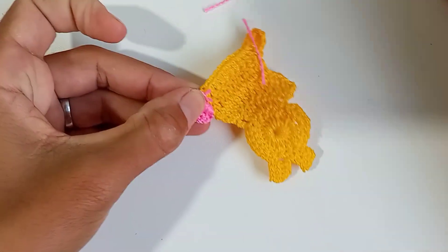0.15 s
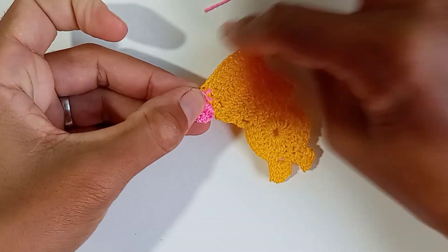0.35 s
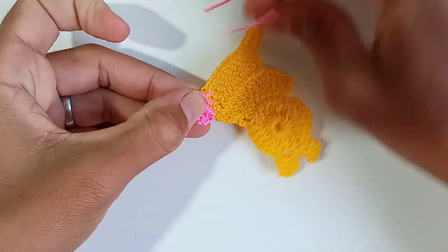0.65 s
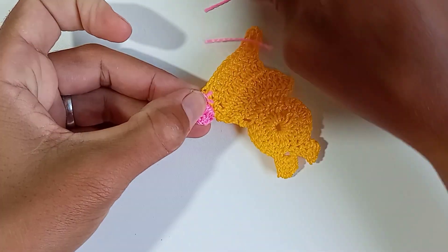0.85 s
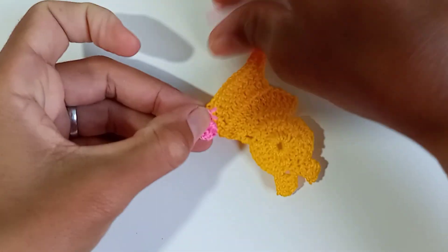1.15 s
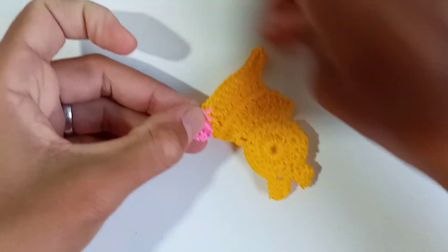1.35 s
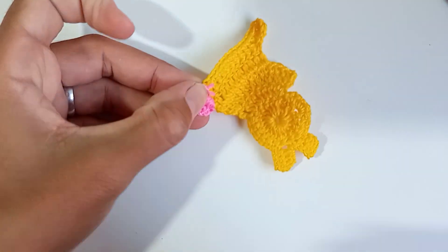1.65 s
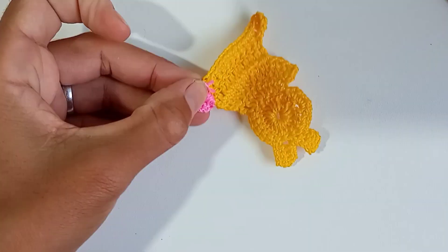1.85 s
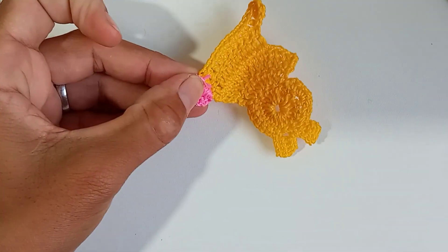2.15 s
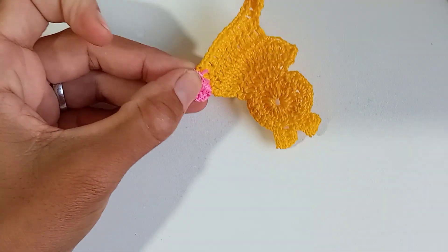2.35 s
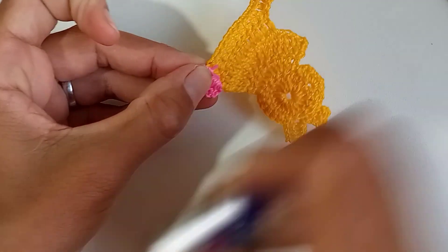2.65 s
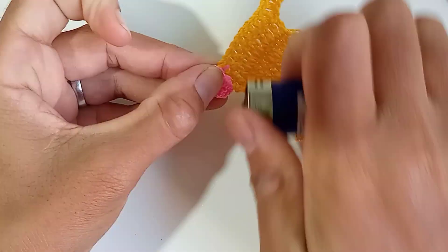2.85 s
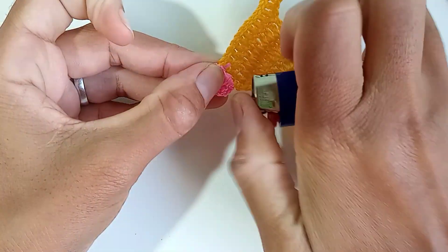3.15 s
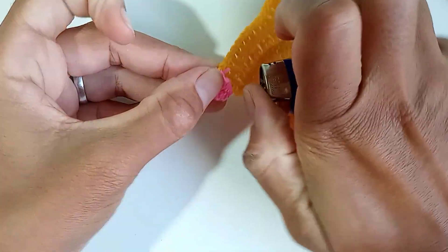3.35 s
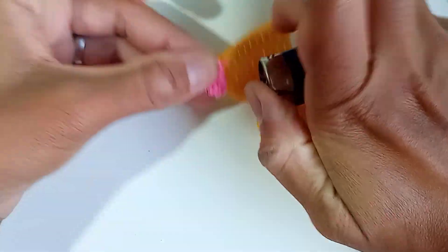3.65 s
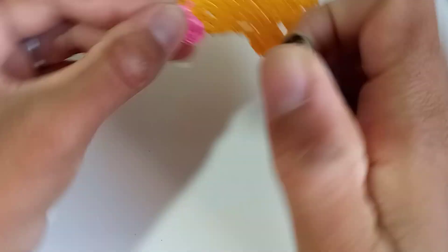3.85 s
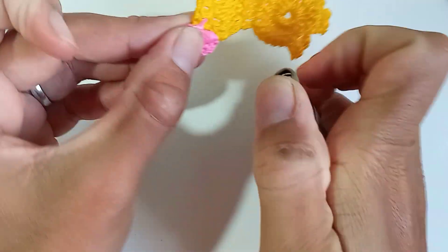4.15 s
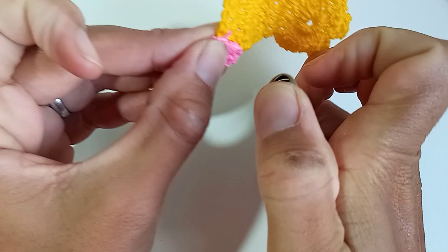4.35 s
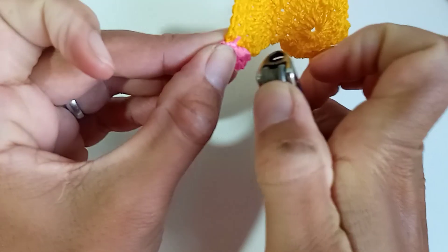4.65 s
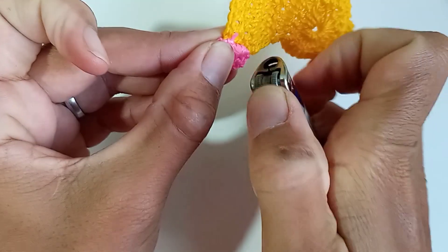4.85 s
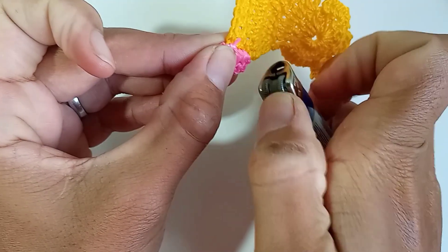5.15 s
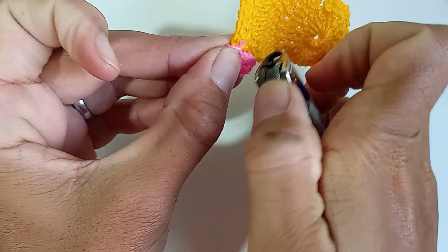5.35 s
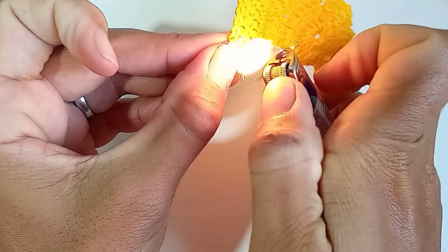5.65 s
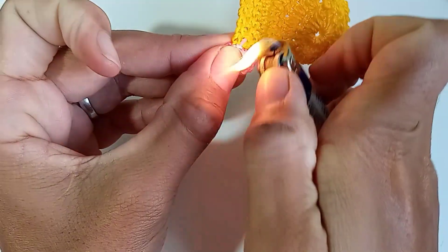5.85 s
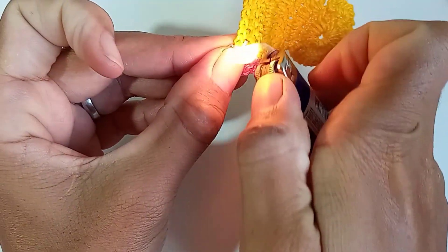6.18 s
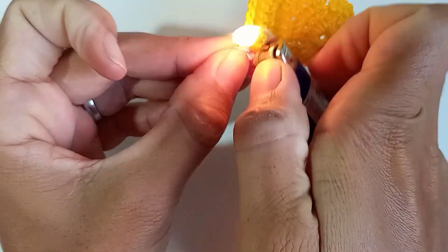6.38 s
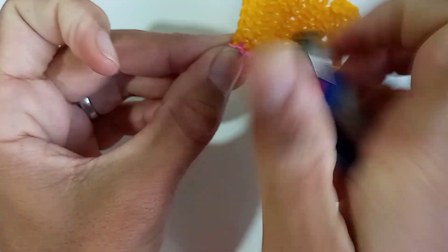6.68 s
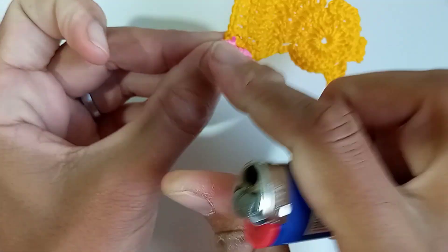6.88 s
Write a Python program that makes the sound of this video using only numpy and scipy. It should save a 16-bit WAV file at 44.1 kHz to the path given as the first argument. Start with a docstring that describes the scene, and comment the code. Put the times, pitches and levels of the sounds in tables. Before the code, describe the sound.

Soft table knocks and a short drag, then a pocket lighter clicks and rasps three times in a small, quiet, faintly humming room.

```python
"""Lighter and hands at a table

Hands drag and set down something on a table in a small quiet room. Skin and yarn rustle as shaped noise.
A pocket lighter is thumbed three times: noise bursts through resonances make its clicks, swelling grains its grind.
A low motor hum throbs by beating tones over a steady hiss, and narrow bands of noise hoot faintly far off.
Two ports hear it all; decaying noise gives the room."""
import sys
import numpy as np
from scipy import signal
from scipy.fft import rfft, irfft, next_fast_len
from scipy.io import wavfile
from scipy.ndimage import uniform_filter1d, map_coordinates

SR = 44100
rng = np.random.default_rng(int(sys.argv[2]) if len(sys.argv) > 2 else 0)


def put_to_file(sound):
    """Save the sound as 16-bit audio at rate SR, in the file named by the first command-line argument."""
    columns = np.atleast_2d(sound).T  # one column per channel
    safe = np.clip(columns, -1, 1)
    whole_steps = np.round(safe * 32767)
    wavfile.write(sys.argv[1], SR, whole_steps.astype(np.int16))


N = 309582
# Source levels in the tables stand ahead of the gains in the functions, scene() and record().


def amp(db):
    """Decibels to amplitude: 20 dB is a factor of ten."""
    return 10 ** (np.asarray(db) / 20)


def unit(x):
    """Normalisation by power: scale to rms 1."""
    return x / np.sqrt(np.mean(x ** 2) + 1e-20)


def along(points, hz):
    """Interpolation of (Hz, value) points on a logarithmic frequency axis."""
    point_hz, value = np.transpose(points)
    return np.interp(np.log(hz + 1), np.log(point_hz + 1), value)


def levels(rows):
    """Envelopes linear in decibels: a gain per sample for each dB column, silent outside the table."""
    point_s, *columns = np.transpose(rows)
    now = np.arange(N) / SR
    return [amp(np.interp(now, point_s, column, -200, -200)) for column in columns]


def wobble(rate, size=N):
    """Band-limited fluctuation: a smooth curve through random knots, rate of them a second."""
    knots = rng.standard_normal(int(size * rate / SR) + 4)
    return map_coordinates(knots, [np.arange(size) * rate / SR])


def filtered(x, response):
    """Linear filtering: the spectrum of x times a complex response of frequency."""
    m = next_fast_len(N + SR // 2)  # padding keeps tails from wrapping round
    spectrum = rfft(x, m) * response(np.fft.rfftfreq(m, 1 / SR))
    return irfft(spectrum, m)[..., :N]


def ringing(modes):
    """Modal superposition: damped resonances (freq_hz, width_hz, level_db) add with alternating sign."""
    def response(f):
        total = 0
        for k, (centre, width, db) in enumerate(modes):
            resonance = 1j * f * width / (centre * centre - f * f + 1j * f * width)
            total = total + (-1) ** k * amp(db) * resonance
        return total
    return response


def twice(modes):
    """Cascaded filtering: resonances applied twice fall off on steeper skirts."""
    return lambda f: ringing(modes)(f) ** 2


def grains(response, rate, rough_db):
    """Friction as many small slips: noise of uneven grain through a response, rms 1."""
    uneven = amp(rough_db * wobble(rate)) * rng.standard_normal(N)
    return unit(filtered(uneven, response))


def lighter_clicks():
    """Impact excitation: a short burst at each click of lever or wheel sets the lighter's parts ringing."""
    # clicks: peak_s, case_db, metal_db, brightness_db, rise_s, left_over_right_db
    clicks = [(.6066, -78, -56.5, 8.5, .0004, -4.5), (.9718, -78, -55, -7, 0.00092, -6),
              (3.0191, -40, -20.5, 1.5, 0.00068, -1), (4.4093, -57.5, -43.5, 2, 0.00077, -2),
              (4.422, -49, -43, 4.5, .001, 4), (4.436, -60, -47, -5.5, .001, -2.5),
              (4.4506, -58, -33, -1.5, .0015, 5), (4.457, -54, -32.5, 5.5, 0.001345, 13.5),
              (4.4695, -44.5, -26, 10.5, .002, 4), (4.4727, -34, -19, 5, 0.000677, -6.5),
              (4.7856, -34, -53.5, -9.5, .0003, 6.5), (4.816, -63, -45.5, 1.5, .001, 1.5),
              (5.047, -54.5, -44.5, 0.5, .002, -1.5), (5.068, -45.5, -31.5, 7, 0.0023, -1.5),
              (5.0756, -38, -21.5, 4, 0.0018, 0.3), (5.0814, -32, -31, 0.5, .001, -14.5),
              (5.3494, -63, -48.5, -6, .0012, 7), (5.3587, -36, -45, -1.5, 0.0017, -1),
              (5.559, -44, -40, -4.5, .002, -7.5), (5.569, -47, -27.5, 5.5, .0015, 4),
              (5.5769, -18.5, -21, -1.5, 0.00055, -9), (6.5665, -33.5, -46.5, -15, 0.0012, -1),
              (6.6, -37, -42.5, 13.5, .001, 5), (6.6039, -36, -30, 3.5, 0.00081, -6.5)]
    # resonances applied twice: freq_hz, width_hz, level_db (width and level of one pass)
    case = [(1780, 350, -5.5), (3200, 950, 0.5), (4900, 320, 4)]  # plastic
    crack = [(2600, 3500, -1), (4770, 6200, 0)]  # the broad, duller part of the metal click
    hood = [(5590, 2400, -1), (8800, 4000, -2.5)]
    spring = [(11300, 8300, -0.5), (14800, 2500, 5.5)]
    click_t60_s, hood_db = 0.016, -1
    parts = np.zeros((2, 4, N))
    t = np.arange(-SR // 100, SR // 40) / SR
    for peak, case_db, metal_db, bright_db, rise, pan_db in clicks:
        onset = np.exp(np.minimum(t, 0) / rise)
        decay = amp(-60 * np.maximum(t, 0) / click_t60_s)
        chatter = np.where(t < 0, onset, decay) * rng.standard_normal((4, len(t)))
        sharp_blow = 4 * (t == 0)
        sizes = amp([case_db, metal_db - bright_db, metal_db + hood_db, metal_db + bright_db])[:, None]
        burst = sizes * amp(3.0) * (chatter + sharp_blow)
        a = round(peak * SR) - SR // 100
        pan = amp([pan_db / 2, -pan_db / 2])[:, None, None]
        parts[..., a:a + len(t)] += pan * burst
    return sum(filtered(parts[:, k], twice(modes)) for k, modes in enumerate([case, crack, hood, spring]))


def flint_wheel():
    """Friction and beating: the wheel's grind swells up to each spark, then two close modes ring on."""
    # thumb strokes: thumb_lands_s, slow_turn_db, spark_s, peak_db, ring_db
    strikes = [(4.408, -53, 4.472, -21.5, -53.5), (5.042, -51.5, 5.076, -23.5, -62),
               (5.525, -72, 5.575, -22, -63.5)]
    # relative spectrum of the grind: freq_hz, level_db
    flint = [(250, -62.5), (500, -22), (1500, -18.5), (2600, -4), (4000, -6.5), (8000, 2), (12000, -0.5),
             (16000, 4)]
    spin_up_db_per_s, stop_db_per_s = 820, 1100.5
    ring_after_s, ring_t60_s, ring_hz, beat_hz = 0.027, 0.53, 1365, 7.2
    force, linger = np.zeros(N), np.zeros(N)
    now, t = np.arange(N) / SR, np.arange(SR // 3) / SR
    pair = np.sin(2 * np.pi * ring_hz * t) + 0.46 * np.sin(2 * np.pi * (ring_hz - beat_hz) * t)
    for lands, creep_db, spark, peak_db, ring_db in strikes:
        swell_db = np.maximum(creep_db, peak_db - spin_up_db_per_s * (spark - now))
        stop_db = peak_db - stop_db_per_s * (now - spark)
        force += (now > lands) * amp(np.where(now < spark, swell_db, stop_db))
        ring = amp(ring_db - 60 * t / ring_t60_s) * (1 - np.exp(-t / 0.0047)) * pair
        linger[round((spark + ring_after_s) * SR):][:len(t)] += ring
    grind = force * grains(lambda f: amp(along(flint, f)), 700, rough_db=1.5)
    return (grind + linger) * amp([[-1.5], [1.5]])


def dragging_and_knocks():
    """Forced modal vibration: friction and small knocks shake the table top and the dragged thing."""
    # one long rub, harder and then stopping: time_s, boom_db, scrape_db, grit_db, skin_db (skin is in hands)
    friction = np.array(levels(RUB)[:3])
    # short skids of the thing: start_s, length_s, sag_db_per_s, boom_db, scrape_db
    skids = [(0.965, 0.096, 154, -42.5, -73), (1.133, 0.068, 50, -49.5, -68.5),
             (1.977, 0.056, 80, -66, -55.5), (2.03, 0.056, 29, -64, -53.5), (2.059, 0.082, 125, -53.5, -68)]
    # small knocks: start_s, top_db, thing_db
    knocks = [(0.973, -12, -50), (1.521, -39, -48), (1.982, -42, -37), (2.061, -33, -32), (2.094, -27, -52),
              (3.021, -46, -37), (5.577, -29, -22)]
    # resonances: freq_hz, width_hz, level_db (friction passes through them twice, knocks once)
    top = [(258.2, 17.5, 1.5), (366, 86, 0.5)]
    thing = [(609, 110, 3), (882, 77, 3.5), (1000, 99, 2), (1370, 225, 0)]
    grit_modes = [(1423, 290, 1), (2130, 620, 2.5), (2940, 850, 4.5), (3840, 2700, -1)]
    skid_rise_s, skid_stop_db_per_s, skid_grit_db = 0.0049, 600, -17
    judder_hz, judder_waver_hz, judder_db = 360.7, 7.1, 1.5  # the rubbed top also sings at its upper mode
    t = np.arange(SR // 2) / SR
    blows = np.zeros((2, N))
    for start, top_db, thing_db in knocks:
        a = round(start * SR)
        decay = amp(-60 * t[:300] / 0.0026)
        blows[:, a:a + 300] += amp([[top_db], [thing_db]]) * decay * rng.standard_normal((2, 300))
    for start, length, sag_db, boom_db, scrape_db in skids:
        fall = amp(-sag_db * t - skid_stop_db_per_s * np.maximum(t - length, 0))
        skid = fall * (1 - np.exp(-t / skid_rise_s))
        sizes = amp([[boom_db], [scrape_db], [scrape_db + skid_grit_db]])
        friction[:, round(start * SR):][:, :len(t)] += sizes * skid
    boom, scrape, grit = friction
    phase = 2 * np.pi * np.cumsum(judder_hz + judder_waver_hz * wobble(20)) / SR
    judder = amp(judder_db + 1.9 * wobble(24.9)) * np.sin(phase)
    drag = boom * (judder + amp(-4.5) * grains(twice(top), 41, rough_db=0.8))
    drag += scrape * grains(twice(thing), 90, rough_db=1.5)
    drag += grit * grains(twice(grit_modes), 200, rough_db=3)
    return drag + filtered(blows[0], ringing(top)) + filtered(blows[1], ringing(thing))


def low_thumps():
    """Free decay: each low thump in the table is an exponentially dying sine."""
    # thumps: start_s, level_db, pitch_hz, t60_s
    bumps = [(0, -35.5, 110.5, 0.35), (.115, -47, 110.6, 0.3), (1.506, -51.5, 55, 0.11),
             (3.995, -63, 55, 0.24)]
    out, t = np.zeros(N), np.arange(SR // 2) / SR
    for start, db, hz, t60 in bumps:
        envelope = amp(db - 60 * t / t60) * (1 - np.exp(-t / 0.0038))
        out[round(start * SR):][:len(t)] += envelope * np.sin(2 * np.pi * hz * t)
    return out


def hands():
    """Sliding friction of soft surfaces: broadband noise follows the rub, restless hands and skin over yarn."""
    # restless hands: time_s, level_db
    rustle = [(0, -70.5), (.5, -67.5), (1.15, -66), (1.95, -69.5), (2.6, -72.5), (3.1, -77), (3.75, -74.5)]
    # skin over yarn: start_s, length_s, level_db
    swishes = [(0.604, .04, -68), (2.001, 0.13, -59), (2.209, .03, -64), (2.278, 0.22, -65.5),
               (2.526, 0.028, -67.5), (3.284, 0.043, -73), (3.418, .22, -54.5)]
    # relative spectrum: freq_hz, level_db
    skin_spectrum = [(600, -7), (1000, -14.5), (2500, -10), (4500, -11), (6500, -5.5), (9000, -2.5),
                     (12000, 1.5), (16000, -1)]
    skin, t = levels(RUB)[3] + levels(rustle)[0], np.arange(SR // 2) / SR
    for start, length, db in swishes:
        arch = np.sin(np.pi * np.minimum(t / length, 1) ** 0.64) ** 2
        skin[round(start * SR):][:len(t)] += amp(db) * arch
    return skin * grains(lambda f: amp(along(skin_spectrum, f)), 150, rough_db=2.0)


# one long rub across the table: time_s, boom_db, scrape_db, grit_db, skin_db
RUB = [(1.24, -72.5, -91, -79, -76), (1.36, -50.5, -59.5, -70.5, -63), (1.43, -67.5, -56, -62.5, -58),
       (1.53, -62.5, -60, -49, -48.5), (1.585, -92, -94, -100, -89.5)]


def ports(x):
    """Interaural-style time difference: the left microphone port hears a source later than the right."""
    lag = 49  # samples
    left, right = x * np.ones((2, 1))
    return np.array([np.pad(left, (lag, 0))[:N], right])


def room(x):
    """Diffuse reverberation: noise tails build up as the walls answer and die faster in the treble."""
    # decay times: freq_hz, t60_s
    decay_times = [(300, 0.28), (2000, 0.26), (8000, 0.25), (15000, 0.17)]
    out, step = np.zeros((2, N + SR)), SR // 4
    for a in range(0, N, step):  # a new random tail every quarter second
        hz, t, z = signal.stft(rng.standard_normal((2, SR // 2)), SR, nperseg=256)
        decay = amp(-60 * t / along(decay_times, hz)[:, None])
        build_up = 1 - 0.35 * np.exp(-(t / 0.0071) ** 2)
        tail = signal.istft(z * decay * build_up, SR, nperseg=256)[1]
        wet = signal.fftconvolve(x[None, a:a + step], tail / np.linalg.norm(tail[0]), axes=1)
        out[:, a:a + wet.shape[1]] += wet
    return out[:, :N]


def far_hoots():
    """Quadrature modulation: random envelopes blur each faint tone into a narrow band, unlike at each port."""
    # hoots: start_s, length_s, pitch_hz, level_db, blur_hz
    calls = [(1.832, 0.16, 2650, -72.5, 80), (2.295, 0.096, 776, -64.5, 38), (3.486, 0.16, 826, -72, 113),
             (3.701, .1, 2166, -68.5, 190), (3.711, .15, 1820, -64, 40.7), (3.863, 0.13, 1960, -73.5, 95),
             (3.927, 0.07, 2630, -76, 52), (5.396, 0.13, 2640, -67.5, 18), (5.657, 0.17, 2740, -74, 58),
             (5.682, 0.25, 2460, -67.5, 160), (6.139, 0.26, 790, -63, 50), (6.063, 0.34, 2020, -76.5, 70),
             (6.903, .2, 707, -71, 39), (6.958, .095, 1715, -75.5, 72)]
    out = np.zeros((2, N + SR))
    for start, length, hz, db, blur_hz in calls:
        t = np.arange(round(length * SR)) / SR
        envelope = amp(db) * np.sin(np.pi * t / length) ** 0.41
        for side in out:
            tone = wobble(2 * blur_hz, size=len(t)) * np.sin(2 * np.pi * hz * t)
            tone += wobble(2 * blur_hz, size=len(t)) * np.cos(2 * np.pi * hz * t)
            side[round(start * SR):][:len(t)] += envelope * tone
    return out[:, :N]


def hum():
    """Beating: a motor tone throbs fast and slowly against close neighbours above and below it."""
    # level of the central tone: time_s, level_db
    course = [(0, -69), (.65, -62), (1.3, -65.5), (2.1, -65), (2.8, -65.5), (3.6, -62.5), (4.7, -62.5),
              (5.4, -64), (6, -63.5), (6.5, -67.5), (7.03, -60)]
    hum_hz, fast_beat_hz, slow_beat_hz = 116.62, 3.45, .75
    above_db, below_db, slow_db = -7.5, -11, -11  # the neighbours against the central tone
    fast_swell_s, slow_swell_s = 0.651, .72  # a crest of each beat
    t = np.arange(N) / SR
    fast = np.exp(2j * np.pi * fast_beat_hz * (t - fast_swell_s))
    slow = np.exp(2j * np.pi * slow_beat_hz * (t - slow_swell_s))
    throb = 1 + amp(above_db) * fast + amp(below_db) / fast + amp(slow_db) / slow
    tone = np.real(throb * np.exp(2j * np.pi * hum_hz * t))
    return levels(course)[0] * amp(0.98 * wobble(13)) * tone


def hiss():
    """Partial coherence: steady, faintly patchy noise is alike on both ports in the bass only."""
    # relative spectrum: freq_hz, level_db
    spectrum = [(15, -47), (25, -37), (50, -10.5), (85, -10.5), (117, -2), (142, -9.5), (270, -12),
                (350, -17), (870, -23), (2000, -24), (5000, -28.5), (16000, -28)]
    # left-right correlation: freq_hz, likeness (1 is identical)
    alike = [(30, .6), (130, 0.84), (290, .05), (16000, 0.057)]
    hiss_db = -64.5
    z = signal.stft(rng.standard_normal((2, N)), nperseg=512)[2]
    patches = uniform_filter1d(uniform_filter1d(rng.standard_normal(z.shape), 5, 1), 10, 2)
    pair = signal.istft(z * amp(4.1 * unit(patches)), nperseg=512)[1][:, :N]

    def mid_and_side(f):
        turn = np.arccos(np.clip(along(alike, f), -1, 1)) / 2  # angle that gives the likeness
        return amp(along(spectrum, f)) * [np.cos(turn), np.sin(turn)]

    mid, side = filtered(pair, mid_and_side)
    return amp(hiss_db) * unit(np.array([mid + side, mid - side]))


def scene():
    """Superposition: direct sound, its reverberation and the background add."""
    lighter = lighter_clicks() + flint_wheel()
    table = dragging_and_knocks() + low_thumps() + hands()
    near = amp([[3.8], [2.2]]) * ports(lighter) + amp(5.0) * ports(table * amp([[.6], [-.6]]))
    reverberation = room(amp(-5) * lighter.mean(0) + amp(-3.5) * table)
    background = hiss() + ports(hum() * amp([[.6], [-.6]]))
    return near + reverberation + far_hoots() + background


def record(dry):
    """Frequency response: each microphone port has its own colour, cut off above the band limit."""
    # port responses: freq_hz, gain_db
    left_port = [(60, 1), (2400, 4), (5000, 2), (8500, 6), (9900, -8), (13300, -22), (14300, -7.5),
                 (15000, -6)]
    right_port = [(60, 0), (2400, -2.5), (6300, -1), (8100, -13.5), (10000, -6), (11400, 2), (12700, -5.5),
                  (13700, -14), (15300, -1.5)]
    band_limit_hz = 15780
    return filtered(dry, lambda hz: amp([along(left_port, hz), along(right_port, hz)]) * (hz < band_limit_hz))


dry = scene()
out = record(dry)
put_to_file(out)
```